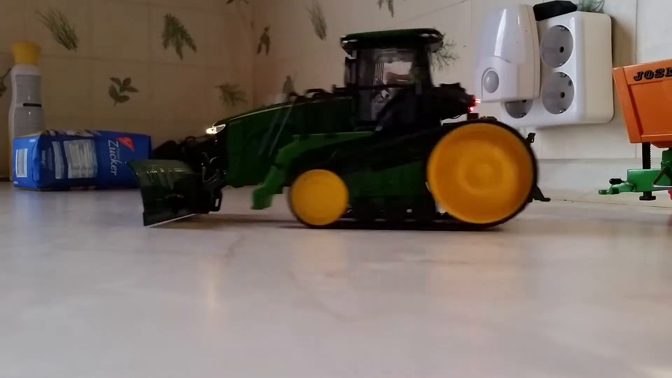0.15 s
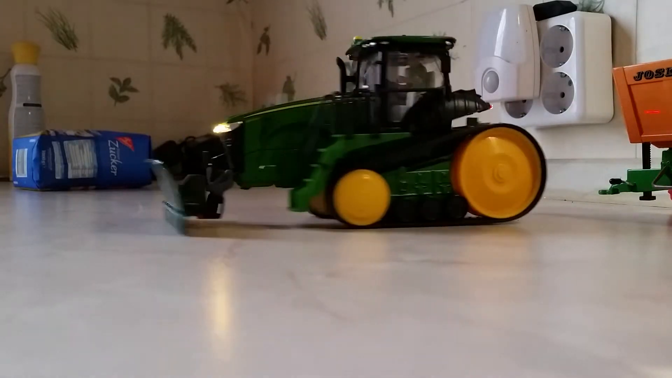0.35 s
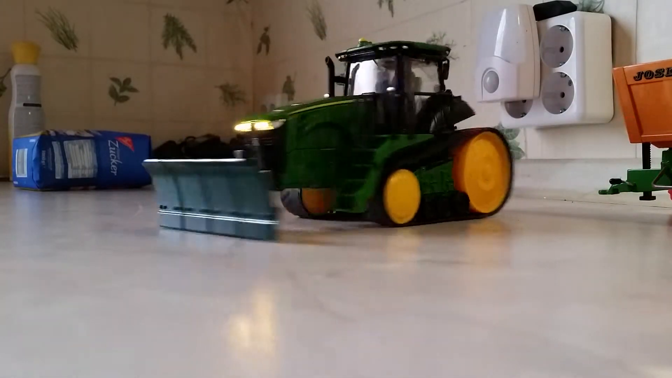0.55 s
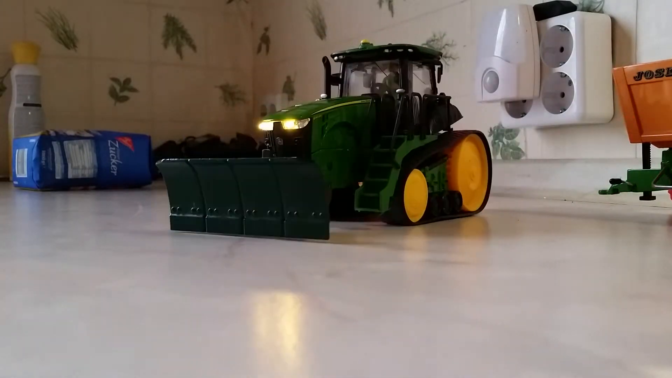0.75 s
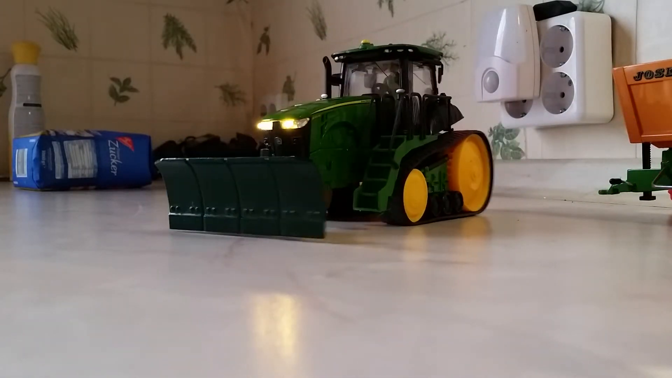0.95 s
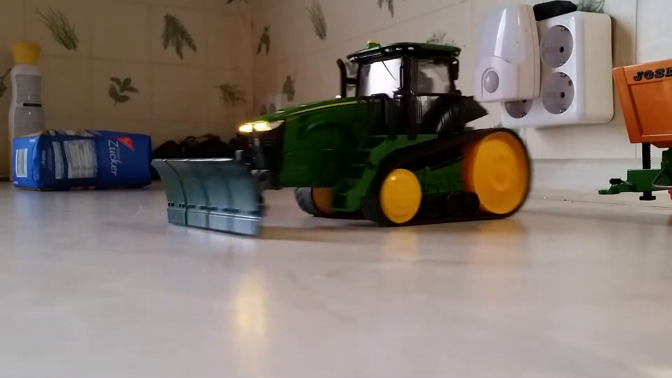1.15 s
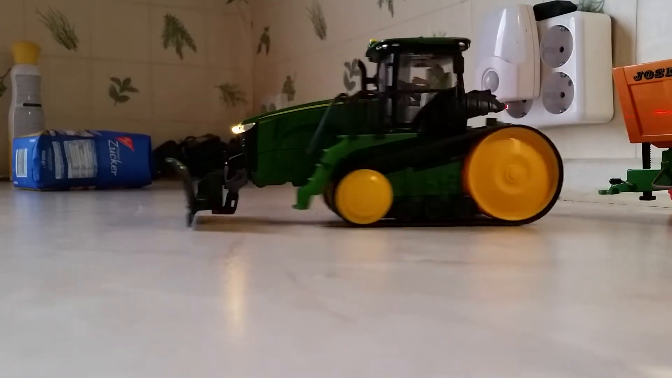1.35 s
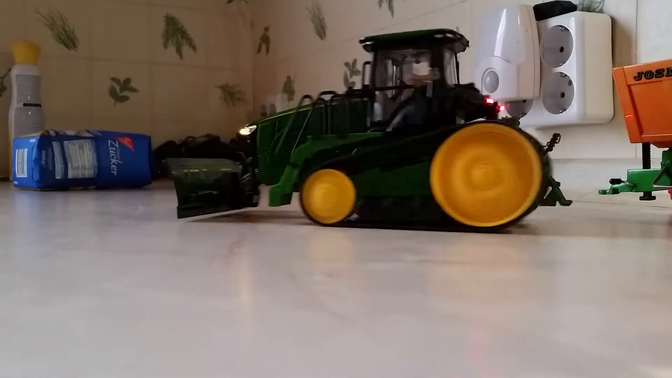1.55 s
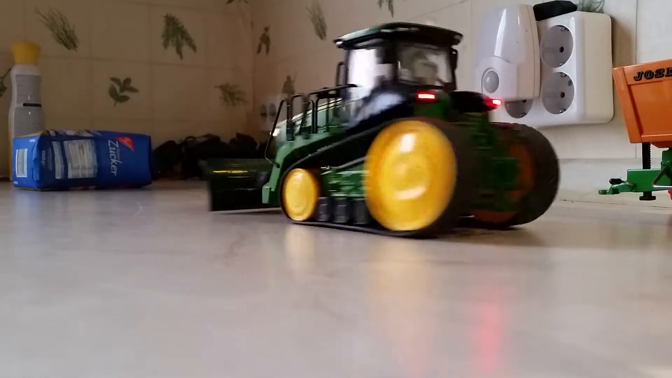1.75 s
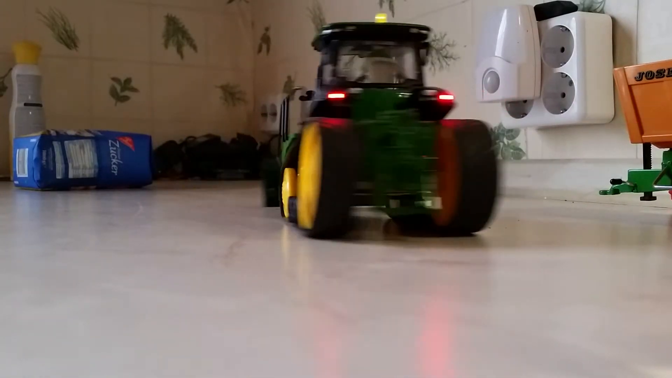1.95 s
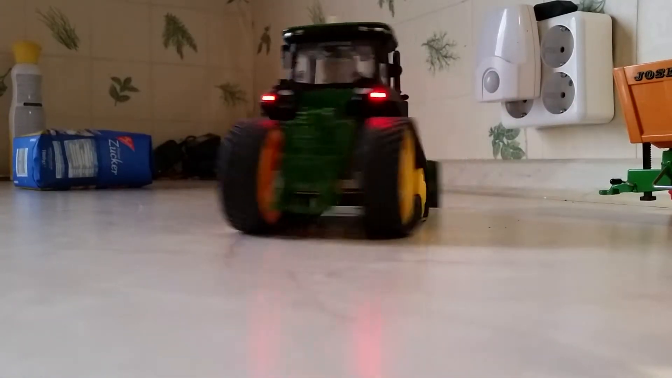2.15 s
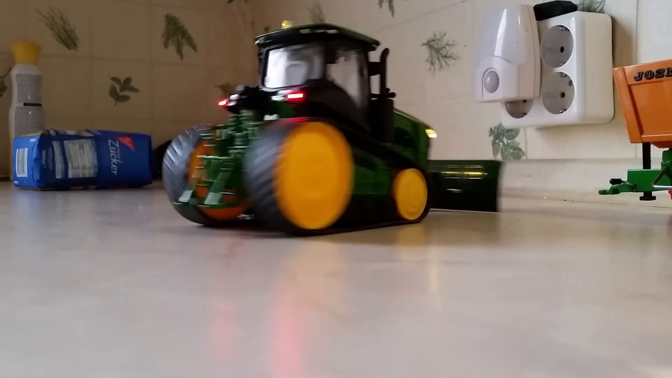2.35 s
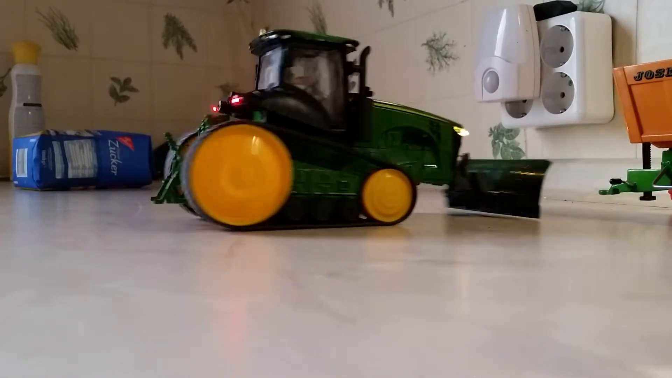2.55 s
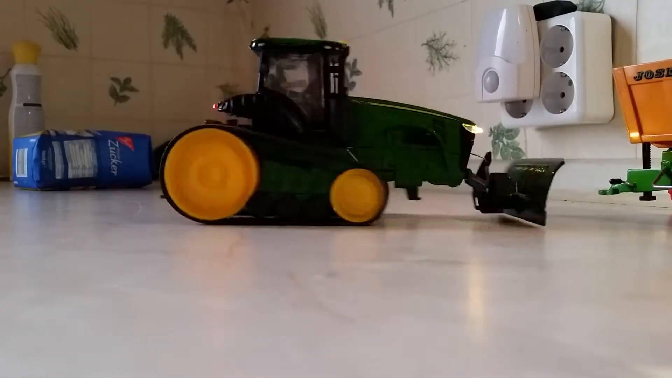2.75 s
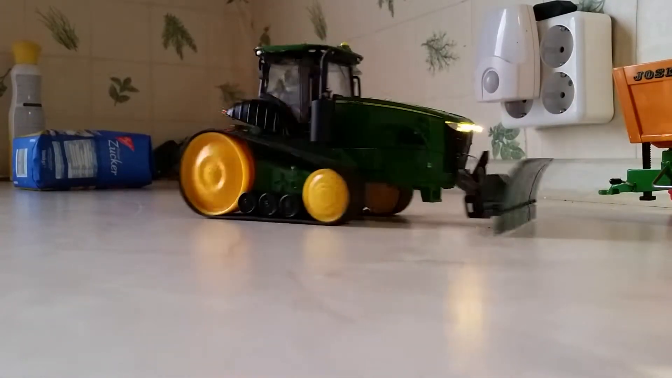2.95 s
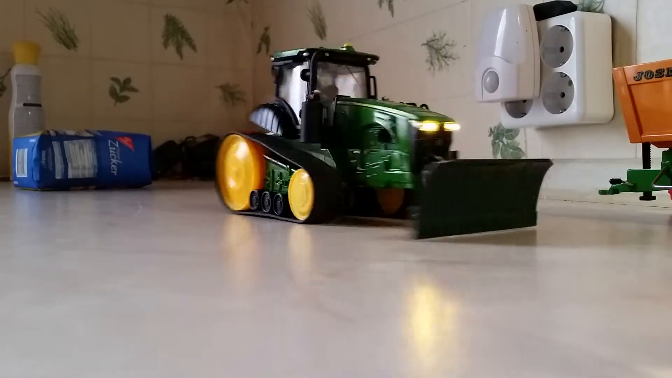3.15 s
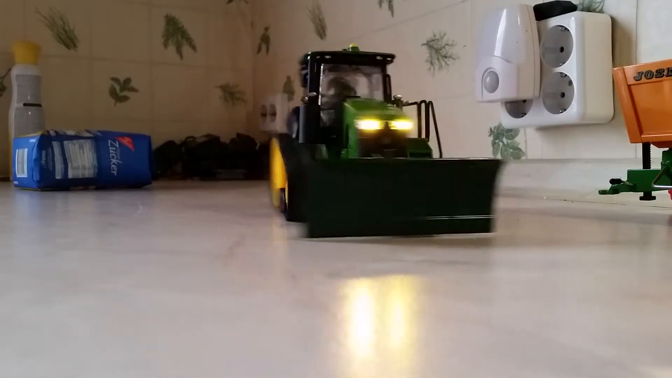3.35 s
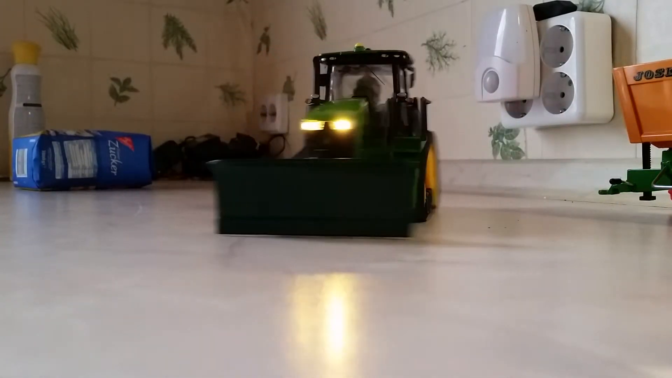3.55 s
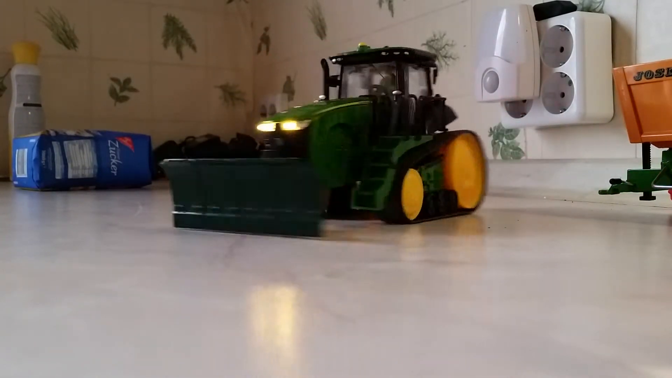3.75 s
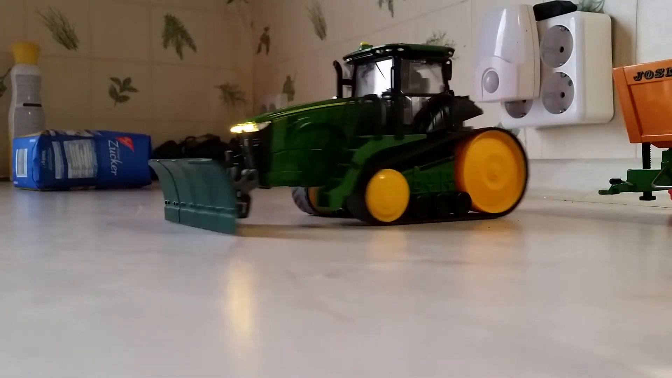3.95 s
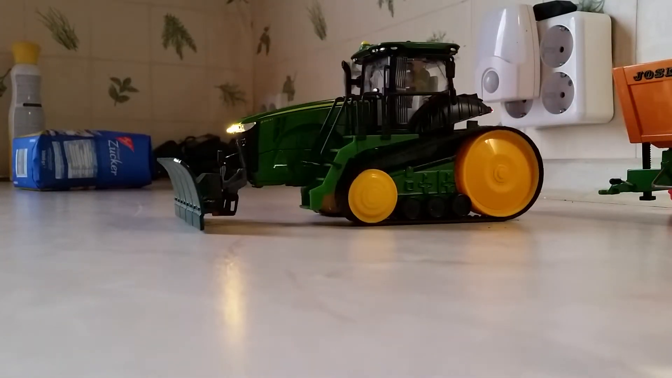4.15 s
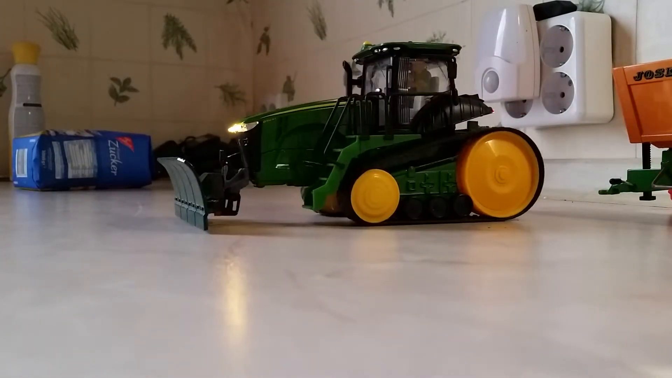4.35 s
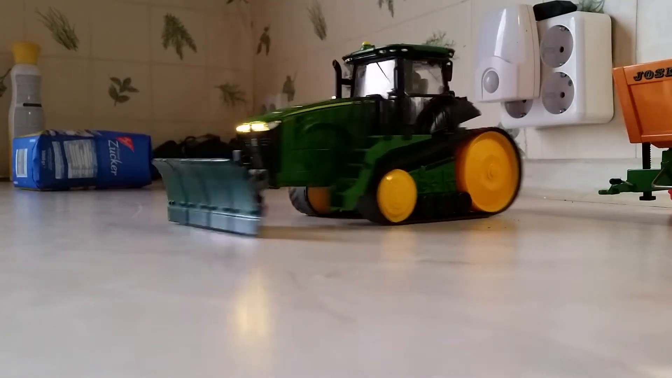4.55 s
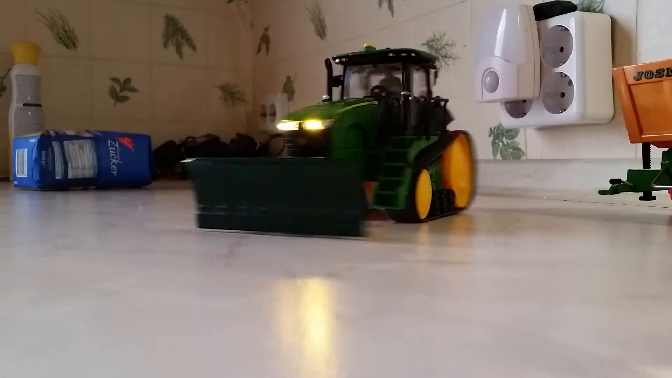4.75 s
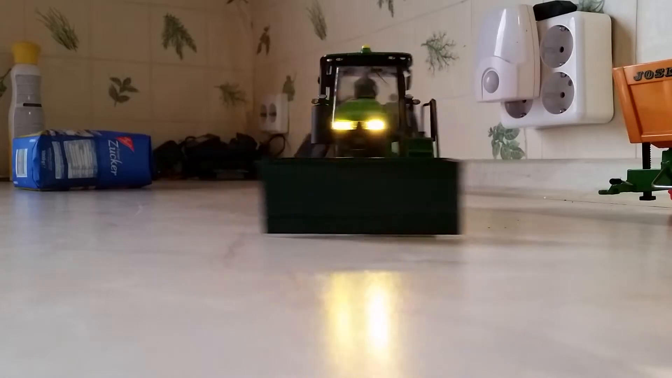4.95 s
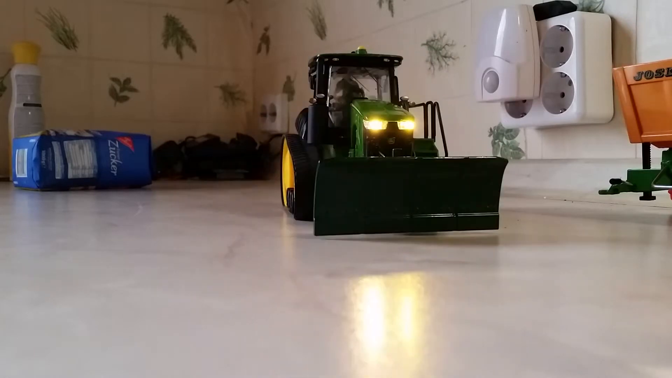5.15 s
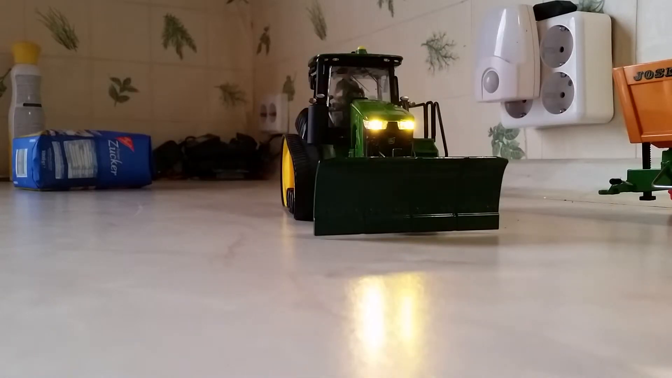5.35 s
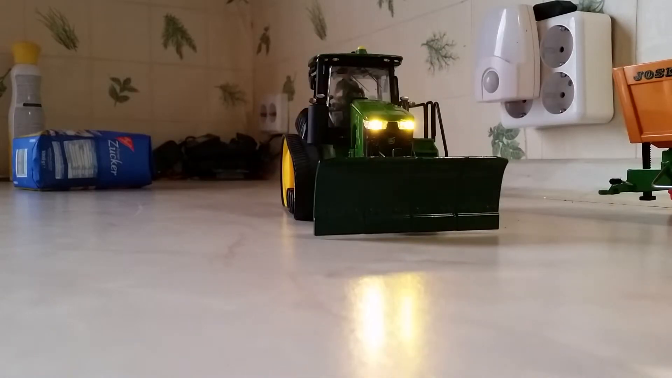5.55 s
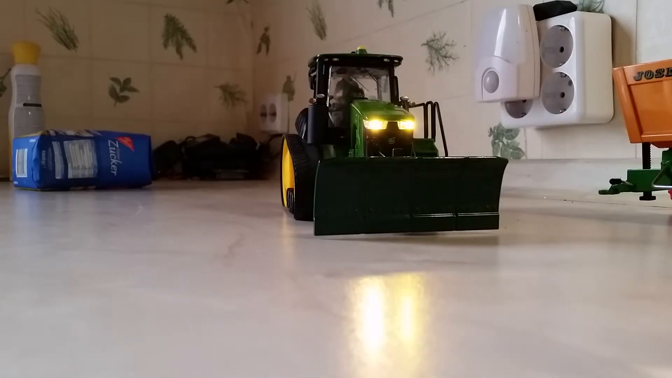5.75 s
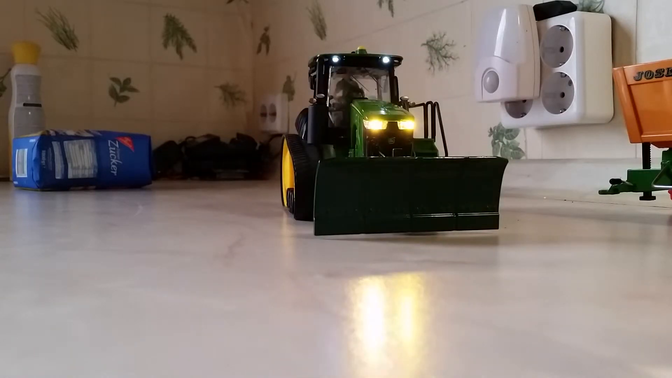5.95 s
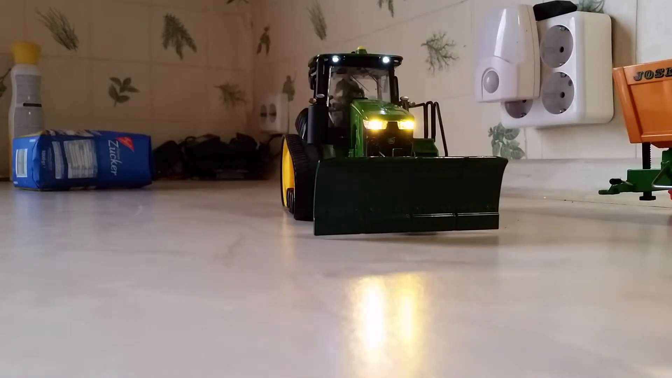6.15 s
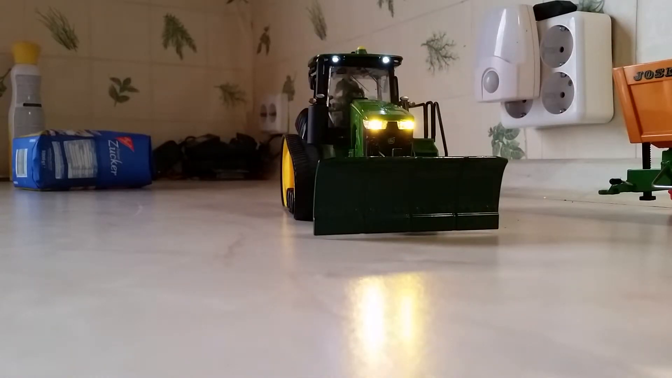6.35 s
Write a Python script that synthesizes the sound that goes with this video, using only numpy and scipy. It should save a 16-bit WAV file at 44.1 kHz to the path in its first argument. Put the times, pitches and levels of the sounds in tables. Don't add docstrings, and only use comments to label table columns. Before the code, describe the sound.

A small tracked toy whirs and rattles in bursts on a hard worktop, with sharp plastic remote-stick snaps around each stop, then faint ticking.

```python
import sys
import numpy as np
from scipy import signal
from scipy.fft import rfft, irfft, next_fast_len
from scipy.io import wavfile
from scipy.ndimage import uniform_filter1d

SR = 44100
rng = np.random.default_rng(int(sys.argv[2]) if len(sys.argv) > 2 else 0)


def rack_gain(trim_db):
    fader = np.asarray(trim_db, float)
    return 10 ** (fader / 20)


def to_wav(sig):
    pcm = np.clip(np.atleast_2d(sig), -1, 1) * 32767
    pcm = np.round(pcm).astype(np.int16)
    wavfile.write(sys.argv[1], SR, pcm.T)


N = 282666
T = np.arange(N) / SR
SIZE = next_fast_len(N + SR // 2)
HZ = np.arange(SIZE // 2 + 1) * SR / SIZE
FEED_HZ, FEED_START_S = 38.9, 0.0245


def level(x, db):
    return x * rack_gain(db) / np.sqrt(np.mean(x ** 2))


def colour(x, points):
    hz, db = np.transpose(points)
    gain_db = np.interp(np.log(HZ + 1), np.log(hz), db)
    return irfft(rfft(x, SIZE) * rack_gain(gain_db), SIZE)[..., :N]


def ring(x, modes):
    gain = 0
    for k, (hz, width, db) in enumerate(modes):
        detuning = (HZ ** 2 - hz ** 2) / (HZ + 1e-3) / abs(width)
        gain = gain + (-1) ** k * rack_gain(db) / (1 + 1j * detuning)
    return irfft(rfft(x, SIZE) * gain, SIZE)[..., :N]


def tones(table, rise):
    out = np.zeros(N)
    for s, db, hz, t60 in table:
        t = np.clip(T - s, 0, None)
        out += rack_gain(db) * np.sin(2 * np.pi * hz * t) * 1000 ** (-t / t60) * np.clip(t / rise, 0, 1)
    return out


def walk(rate):
    k = int(SR / rate)
    held = np.repeat(rng.standard_normal(N // k + 1), k)
    return 1.18 * uniform_filter1d(uniform_filter1d(held, k), k)[:N]


def noise():
    return rng.standard_normal(N)


def rattle(rate, spread_db):
    hit = rng.random(N) < rate / SR
    return hit * rng.choice([-1, 1], N) * rack_gain(spread_db * np.minimum(rng.exponential(size=N), 4))


def strikes(times, db):
    out = np.zeros(N)
    out[(np.asarray(times) * SR).astype(int)] = rack_gain(db)
    return out


def burst(x, t60):
    t = T[:2000]
    return signal.fftconvolve(x, 1000 ** (-t / t60))[:N] * rng.standard_normal(N)


def pair(source, alike):
    return np.sqrt(alike) * source() + np.sqrt(1 - alike) * np.array([source(), source()])


def ports(x, balance):
    balance = np.array(balance)
    return np.array([colour(x[0], balance * [1, .5]), colour(x[-1], balance * [1, -.5])])


def earlier_left(x, samples):
    return np.array([np.append(x[0, samples:], np.zeros(samples)), x[1]])


def heading(column):
    # time in seconds, gearbox turned away from 0 to 1, teeth left minus right in dB.
    turning = np.array([(0, 0.05, -12.5), (0.7, 0.43, -8), (1.0, 0.7, -14), (1.8, 0.84, -11.5),
                        (3.2, 0.8, -4.5), (3.7, 1, -14), (4.2, 0.02, -7.5), (5.1, 0.06, -16.5)])
    return np.interp(T, turning[:, 0], turning[:, column])


def facing(x, front, back):
    away = np.clip(heading(column=1), 0, 1)
    near_side = level(colour(x, front), 0)
    far_side = level(colour(x[::-1, ::-1], back), 0)
    return np.sqrt(1 - away) * near_side + np.sqrt(away) * far_side


def running(column, fall_s):
    # start in seconds, spin-up in seconds, stop in seconds,
    # motors after the stop in dB, rolling after the stop in dB.
    drives = [
        (-0.2, 0.05, 0.655, -20.5, -8.5),
        (0.898, 0.076, 4.03, -12, -4),
        (4.313, 0.049, 5.06, -20.5, -10),
    ]
    s, db, rest_db = [], [], 0
    for row in drives:
        start, rise, stop = row[:3]
        s += [start, start + rise, stop, stop + fall_s]
        db += [rest_db, 0, 0, row[column]]
        rest_db = row[column]
    settle_s, settle_db = 0.25, -10
    return np.interp(T, s + [s[-1] + settle_s], db + [rest_db + settle_db])


def motors():
    return running(column=3, fall_s=0.05)


def rolling():
    return running(column=4, fall_s=0.11)


def part_db(law, stop_db, column):
    # time in seconds, motor effort in dB, turning speed in dB.
    effort = np.array([(0.0, 1, -0.7), (0.27, 2.5, 3), (0.42, 3.5, -0.5), (0.55, 3.5, -2),
                       (0.65, -1.5, -5.5), (0.97, -12.5, -7), (1.3, -2.2, 2), (1.55, -0.5, 1.8),
                       (1.8, 1.5, 2), (2.3, 1.2, 0.6), (2.8, 0, 1), (3.3, -1.5, -3), (3.67, -2, -1.5),
                       (3.9, -2, -2), (4.02, -6, -2.5), (4.4, -7, -4), (4.7, 0, -1.5), (5.05, -7.5, -3)])
    db, away_db, share, stop_share = law
    control_db = np.interp(T, effort[:, 0], effort[:, column])
    return db + away_db * heading(column=1) + share * control_db + stop_share * stop_db


def feed(depth_db, peak):
    cycles = (T - FEED_START_S) * FEED_HZ
    return rack_gain(depth_db * (0.5 + 0.46 * walk(30)) * np.cos(2 * np.pi * (cycles - peak)))


def patchy(x):
    band_edges = [200, 9000, 11000, 11800, 12600, 13400, 14200, 17000]
    depth_db = 2.5 * (1 - 0.6 * heading(column=1))
    spectrum, out = rfft(x, SIZE), 0
    for lo, hi in zip(band_edges[:-1], band_edges[1:]):
        band = irfft(spectrum * (HZ >= lo) * (HZ < hi), SIZE)[:, :N]
        out = out + band * rack_gain(depth_db * walk(14))
    return out


def gear_teeth():
    # frequency in Hz, level in dB; gearbox towards the phone, then away from it.
    teeth_front = [(5000, -44.5), (8500, -29.5), (9710, -21), (11700, -2.5), (13600, -3), (14900, -13.5),
                   (15100, -30), (15200, -78.5), (15500, -81)]
    teeth_back = [(5000, -28), (8500, -35.5), (10200, -9), (11800, 2.5), (14300, 3), (15000, 11),
                  (15100, -6), (15200, -69), (15500, -81)]
    teeth_law = (-30.5, -10.5, 1.12, 2.3)
    teeth = patchy(facing(pair(lambda: rattle(14000, 0.77), 0.25), teeth_front, teeth_back))
    pan_db = heading(column=2)
    db = part_db(teeth_law, motors(), column=1) - 3.0 + 1.84 * walk(350)
    standstill_s = 5.16
    return teeth * feed(2.3, 0.67) * (T < standstill_s) * rack_gain(db + np.array([pan_db, -pan_db]) / 2)


def housing_buzz():
    # frequency in Hz, level in dB; gearbox towards the phone, then away from it.
    housing_front = [(590, -54.5), (1000, -36), (1140, -15), (1580, -3), (2350, -4), (2630, 0.5),
                     (2830, 3.5), (3370, -14.5), (3690, -6.5), (4230, -19), (4560, -8), (5330, -14),
                     (5790, -29.5), (7020, -1.5), (9000, -12.5), (11700, -24), (19800, -120)]
    housing_back = [(590, -19), (1000, -15), (1270, -7.5), (1530, -0.5), (1850, -2.5), (1970, -1.5),
                    (2800, 1), (3240, -8.5), (3690, -6.5), (4120, -15.5), (4640, -6.5), (6230, -13.5),
                    (6960, -4.5), (8060, -11), (9000, -3), (11700, -26), (19800, -120)]
    housing_law = (-45, -4, 0.81, 1.26)
    buzz = facing(pair(lambda: rattle(6000, 0.34), 0.16), housing_front, housing_back)
    return buzz * feed(2.5, 0.42) * rack_gain(part_db(housing_law, motors(), column=1) + 1.26 * walk(60))


def track_rub():
    # frequency in Hz, level in dB.
    rub_colour = [(110, -44.5), (180, -2.5), (306, -6), (452, -1.5), (521, -6), (751, -3.5), (976, -10.5),
                  (1200, -15.5), (1560, -15), (2640, -120)]
    rub_law = (-55.5, 0.3, 0.52, 1.16)
    rub = level(colour(pair(noise, 0.47), rub_colour), 0.1)
    return rub * rack_gain(part_db(rub_law, rolling(), column=2) + 0.605 * walk(20))


def worktop_rumble():
    # frequency in Hz, width in Hz, level in dB.
    worktop_modes = [(39.5, 14.4, 3.5), (56, 17.5, 3), (84.1, 12.3, -4.5), (121.7, 10.8, 0),
                     (182.5, 122, -16.5)]
    worktop_law = (-48, -2.3, 1.26, 1.07)
    rumble = level(ring(pair(lambda: rattle(300, 1.3), 0.75), worktop_modes), 0.052)
    return rumble * rack_gain(part_db(worktop_law, rolling(), column=2) + 1.5 * walk(9))


def whine():
    # time of the peak in seconds, frequency in Hz, level in dB.
    panel_notes = [
        (0.0, 2706, -52.5),
        (0.3, 2600, -56),
        (4.46, 2590, -46.5),
        (4.6, 2150, -63),
    ]
    rise_db_s, fall_db_s = 124.5, 28
    out, a, b = 0, walk(140), walk(140)
    for s, hz, db in panel_notes:
        db = db - np.where(T < s, rise_db_s * (s - T), fall_db_s * (T - s))
        out = out + rack_gain(db) * (a * np.cos(2 * np.pi * hz * T) + b * np.sin(2 * np.pi * hz * T))
    return out * feed(3.5, 0.3) * rack_gain(motors())


def air():
    # frequency in Hz, level in dB.
    air_colour = [(15, -36.5), (25, -8.5), (433, -23), (741, -26), (1240, -37.5), (2230, -23.5),
                  (2420, -37.5), (2840, -33), (4300, -29.5), (6000, -46), (7100, -47.5), (9800, -55.5),
                  (12200, -32.5), (15500, -62)]
    return level(colour(pair(noise, 0.31), air_colour), -70)


def idle_ticks():
    # frequency in Hz, width in Hz, level in dB; lower body, then cabin.
    chassis_modes = [(1320, 60, -32), (1710, 73.4, -15), (2145, 97, -7.5), (3730, 197, -10.5)]
    cab_modes = [(2825, 70, -2), (2890, 90, 0)]
    s = FEED_START_S + np.arange(int(6.3 * FEED_HZ)) / FEED_HZ
    ticks = 0
    for delay_s, db in [(0.001, 8.5), (0.004, 2.5), (0.0135, -6)]:
        ticks = ticks + strikes(s + delay_s, db + 1.8 * rng.standard_normal(len(s)))
    ticks = ring(ticks, [(2484, 2000, 0)])
    parts = level(ring(ticks, chassis_modes), -69) + level(ring(ticks, cab_modes), -69.5)
    return parts * rack_gain(0.41 * rolling())


def stick_snaps():
    # time in seconds, shell level in dB, strongest shell tone in Hz,
    # hollow in dB above the shell, crack in dB above the shell.
    snap_events = [(0.5351, -15.5, 1875, -0.5, 3.5), (0.5404, -15.5, 1860, -6, -8),
                   (0.5521, -32, 2060, 0, -11), (0.557, -23, 2100, 6.5, 4), (0.577, -46.5, 2030, 11, -1),
                   (0.7071, -41, 1790, -1, -27), (0.856, -46, 1720, 4.5, 1.5), (3.903, -29, 1720, 0.5, -16),
                   (3.9167, -21.5, 1730, -1.5, 6), (3.9219, -17, 1910, -2, -27), (3.9277, -30, 1800, 3, -7),
                   (3.9336, -35, 1600, 9, 18), (3.948, -37.5, 1840, 14.5, 2), (4.1121, -24, 1850, 1, -23),
                   (4.9731, -28, 1840, 8, 13), (4.9788, -22, 1814, -15.5, -1.5), (4.99, -27, 1790, 4, 7),
                   (5.0023, -33.5, 1480, 3.5, -6), (5.8034, -34, 2900, -6.5, 2.5),
                   (6.0014, -25, 2015, -11, -6)]
    # frequency in Hz, width in Hz, level in dB.
    shell_modes = [(1510, 240, -7.5), (1731, 84, 3.5), (2100, 130, 7.5), (2355, 520, 2), (3175, 69, 1)]
    hollow_modes = [(348, 107, -10), (448, 74, 0), (650, 210, -3.5), (890, 57, -1), (1111, 102, -6.5)]
    edge_modes = [(3790, 2420, 5.5), (5270, 610, -15.5)]
    crack_modes = [(7270, 1500, 0), (8630, 4050, -3), (9660, 690, 1.5), (12900, 1260, -1)]
    # time in seconds, level in dB,
    # frequency in Hz, time to fade by 60 dB in seconds.
    cavity_tones = [(0.548, -24, 497, 0.073), (3.925, -32, 516, 0.093), (4.114, -32.5, 510, 0.073),
                    (4.990, -26.5, 503, 0.19), (5.805, -57, 503, 0.38)]
    touch_tones = [(5.478, -62, 1320, 0.025), (0.857, -45.5, 340, 0.036), (5.803, -39, 4000, 0.013),
                   (5.802, -54, 418, 0.083), (6.001, -46, 1685, 0.043), (6.002, -38.5, 4400, 0.015)]
    # frequency in Hz, left minus right in dB.
    remote_balance = [(300, -3), (1000, 6), (3000, 1.5), (4500, 0), (7500, 2.5), (10500, 5.8), (13000, -7)]
    s, db, hz, hollow_db, crack_db = np.transpose(snap_events)
    out = rack_gain(23.0) * ring(strikes(s, db), shell_modes)
    out += rack_gain(33) * ring(strikes(s, db + hollow_db), hollow_modes)
    out += rack_gain(20.5) * ring(ring(strikes(s, db + crack_db - 14), edge_modes), edge_modes[:1])
    out += rack_gain(1.5) * ring(burst(strikes(s, db + crack_db), 0.016), crack_modes)
    chatter = burst(strikes(s, db - 8 + 0.25 * crack_db), 0.029)
    out += ring(chatter, [(2600, 4400, 1.0), (5340, 2520, -0.5)])
    out += tones(zip(s, db + 4.0, hz, np.full(len(s), 0.014)), 0.001)
    out += tones(cavity_tones, 0.0025) + tones(touch_tones, 0.0005)
    return ports([out], remote_balance)


def stick_push():
    # time in seconds, level in dB, frequency in Hz, time to fade by 60 dB in seconds.
    push_ticks = [
        (0.8562, -37, 4400, 0.007),
        (0.8568, -40, 3500, 0.008),
        (0.8585, -42, 4000, 0.008),
    ]
    return tones(push_ticks, 0.0002)


def thump():
    # time in seconds, level in dB, frequency in Hz, time to fade by 60 dB in seconds.
    rocks = [
        (0.936, -45.5, 95.2, 0.11),
        (4.152, -29.5, 131.3, 0.14),
    ]
    return tones(rocks, 0.0021)


def gear_slack():
    # time in seconds, teeth level in dB, housing in dB above the teeth.
    scrapes = [(4.093, -51, -7), (4.1515, -45, -8), (4.1899, -47.5, 0), (4.2183, -48, -6),
               (4.244, -37.5, -21), (4.268, -46.5, 2.5), (4.2975, -42, -2), (4.3331, -28, -13),
               (5.1758, -40.5, -15.5), (5.342, -61.5, -7), (5.3827, -64, -16), (5.5366, -57.5, -5.5),
               (5.69, -96, -8.5), (5.7167, -68, -7), (6.1464, -63, 8.5)]
    s, db, housing_db = np.transpose(scrapes)
    teeth = ring(burst(strikes(s, db), 0.034), [(11700, 2100, 0)])
    teeth = ring(teeth, [(11250, 2200, -4), (12500, 2100, 4.5)])
    housing = ring(burst(strikes(s, db + housing_db), 0.038), [(2570, 1400, 0)])
    housing = ring(housing, [(2590, 600, 0)])
    return rack_gain(4) * teeth + rack_gain(15.0) * housing


def room(x):
    # frequency in Hz, time to fade by 60 dB in seconds, level in dB.
    room_bands = [(89, 0.29, 11), (387, 0.27, 2), (1698, 0.22, 4.5), (6420, 0.29, 5.5), (12000, 0.11, 3.5)]
    t, tail = T[:SR // 2], 0
    for hz, t60, db in room_bands:
        band = signal.butter(2, [hz / 2, min(hz * 1.8, 20000)], "band", fs=SR, output="sos")
        hiss = signal.sosfilt(band, rng.standard_normal((2, len(t))))
        tail = tail + rack_gain(db) * hiss * 1000 ** (-t / t60)
    tail = tail * np.clip(t / 0.00083, 0, 1)
    return signal.fftconvolve(x, tail / np.sqrt(np.sum(tail ** 2) / 2), axes=1)[:, :N]


def scene():
    # frequency in Hz, left minus right in dB.
    toy_balance = [(60, -5.5), (110, -12), (200, -6.5), (380, -4), (700, 3), (1290, 2), (2380, 4.5),
                   (4400, -4), (8120, 7.5), (15000, -13.5)]
    teeth = gear_teeth()
    body = housing_buzz() + track_rub() + worktop_rumble()
    toy = teeth + ports(body + whine() + gear_slack() + thump(), toy_balance)
    ticks = ports([idle_ticks()], toy_balance)
    remote, push = stick_snaps(), stick_push()
    wet = room(rack_gain(-7) * toy + rack_gain(-0.5) * remote + rack_gain(-11) * ticks + rack_gain(-2.5) * push)
    return earlier_left(toy + ticks + air(), samples=5) + earlier_left(remote, samples=7) + push + wet


def low_pass(x):
    return signal.sosfilt(signal.butter(12, 15630, fs=SR, output="sos"), x)


def record(dry):
    # frequency in Hz, level in dB.
    mic_response = [(20, -24), (30, -7), (40, 0), (14500, 0), (14700, -24), (15000, -38), (16000, -45)]
    mix = colour(dry, mic_response)
    return low_pass(mix)


dry = scene()
out = record(dry)
to_wav(out)
```